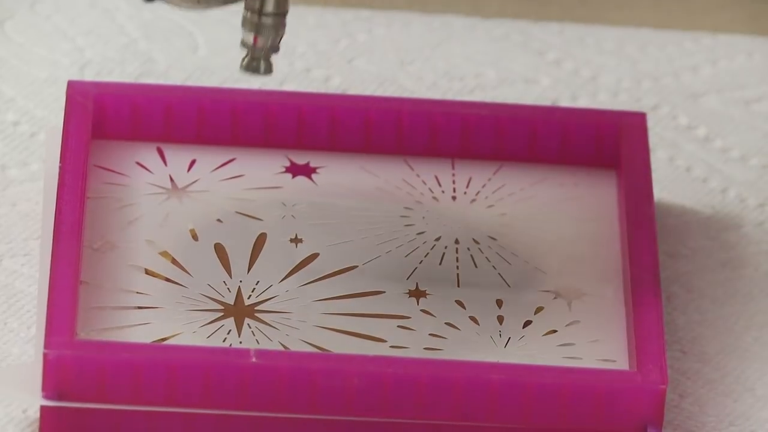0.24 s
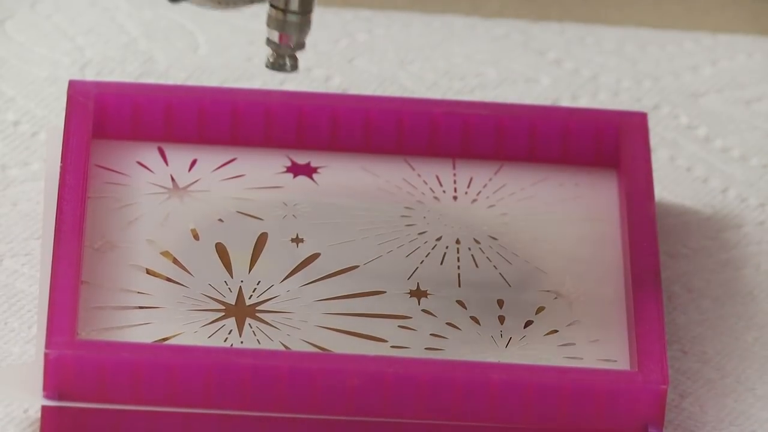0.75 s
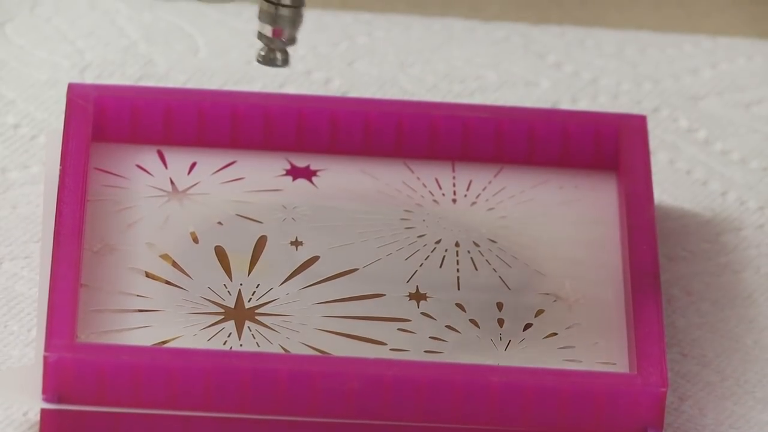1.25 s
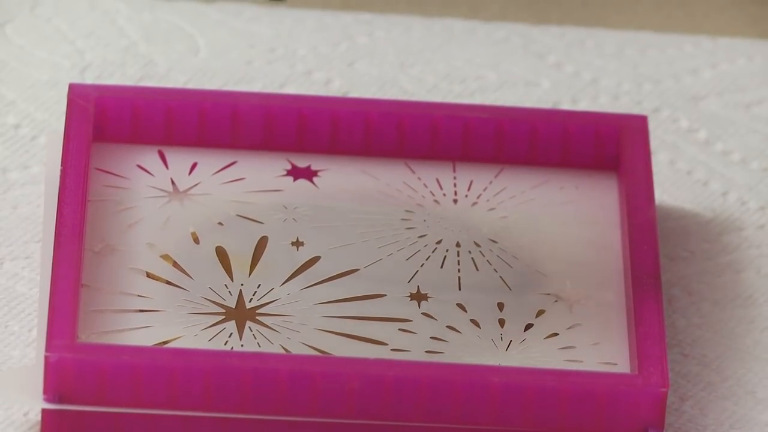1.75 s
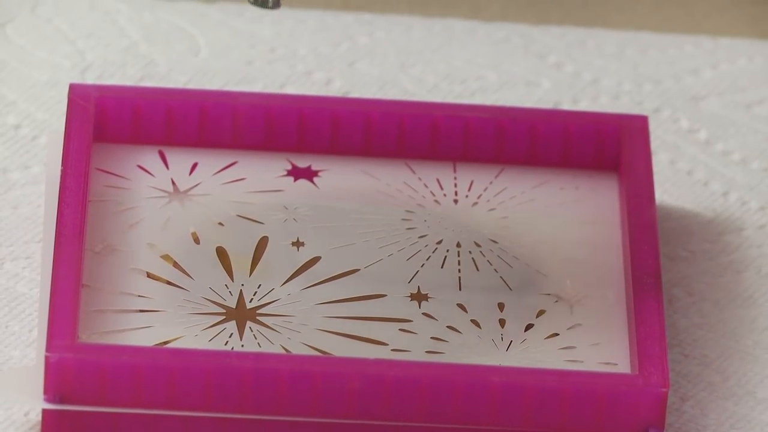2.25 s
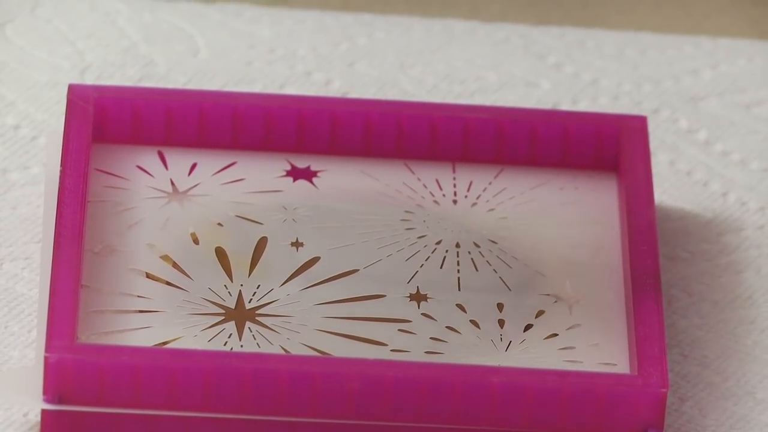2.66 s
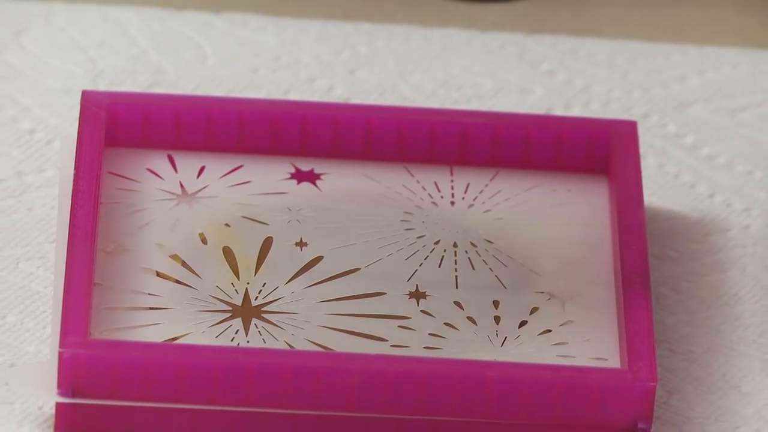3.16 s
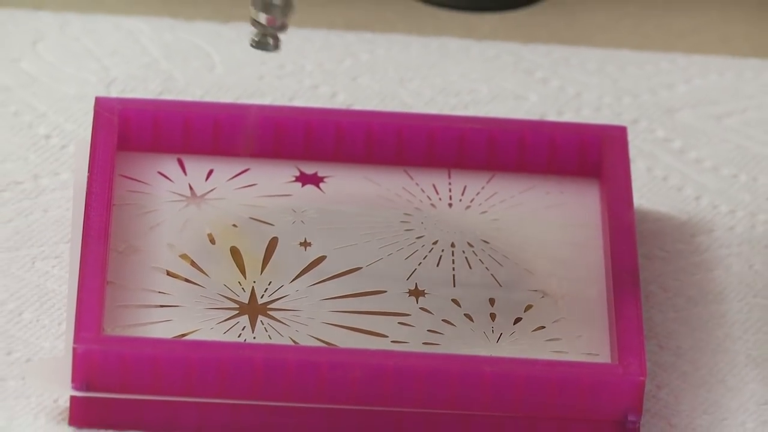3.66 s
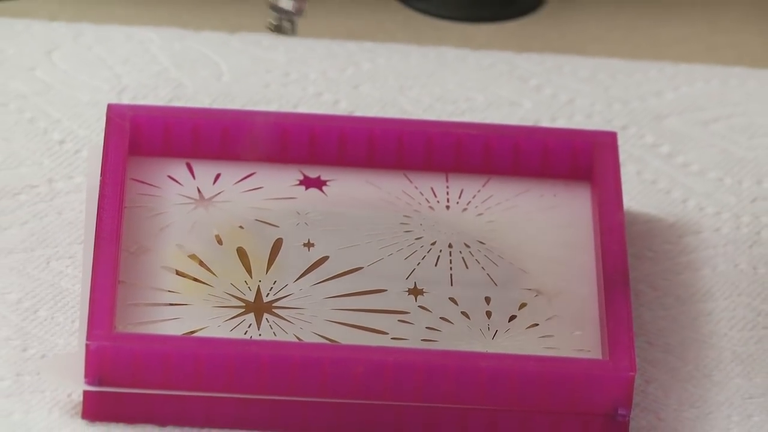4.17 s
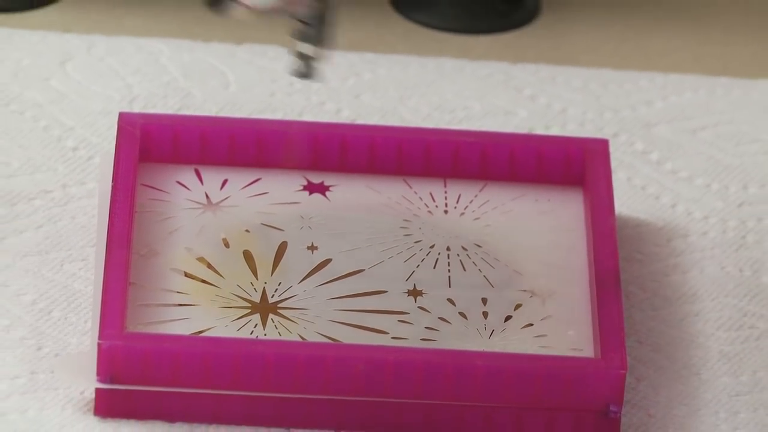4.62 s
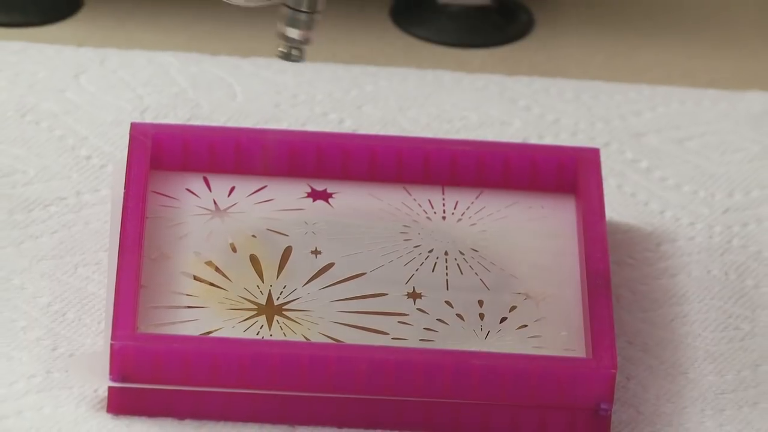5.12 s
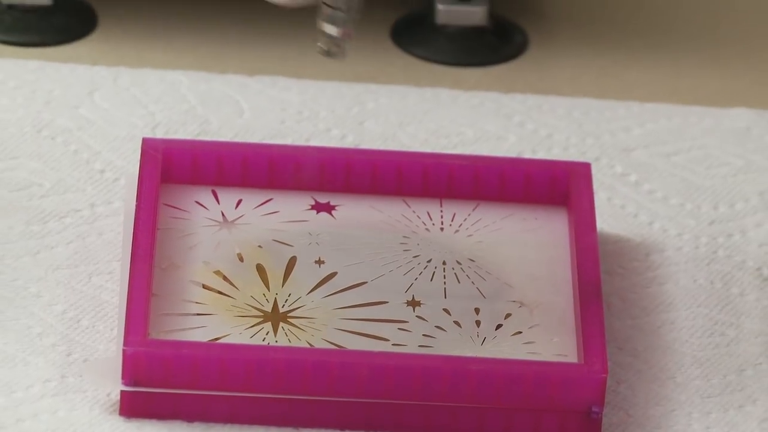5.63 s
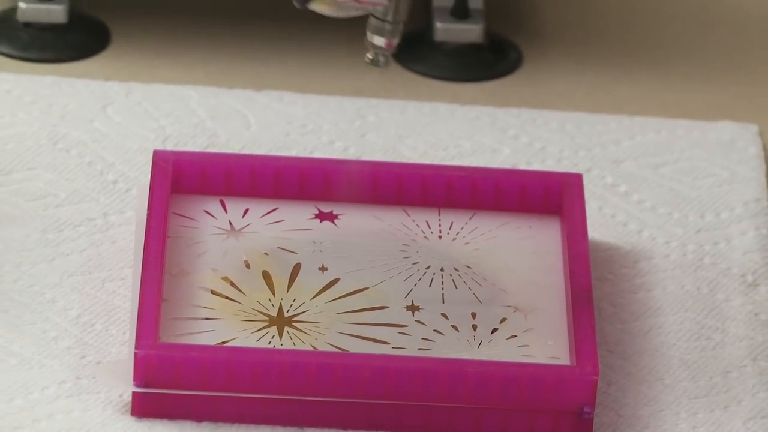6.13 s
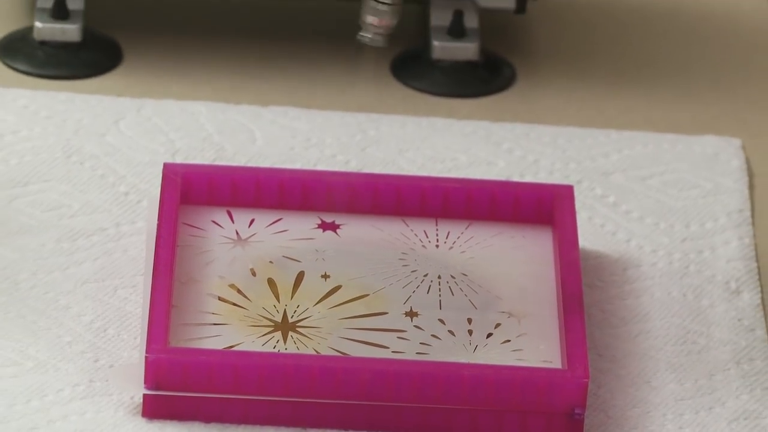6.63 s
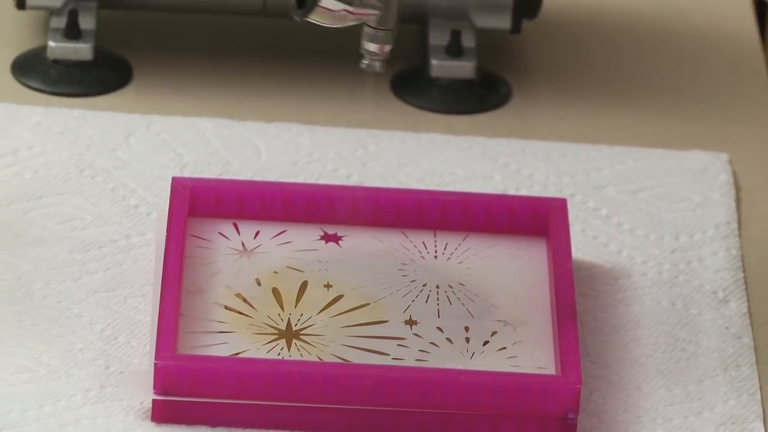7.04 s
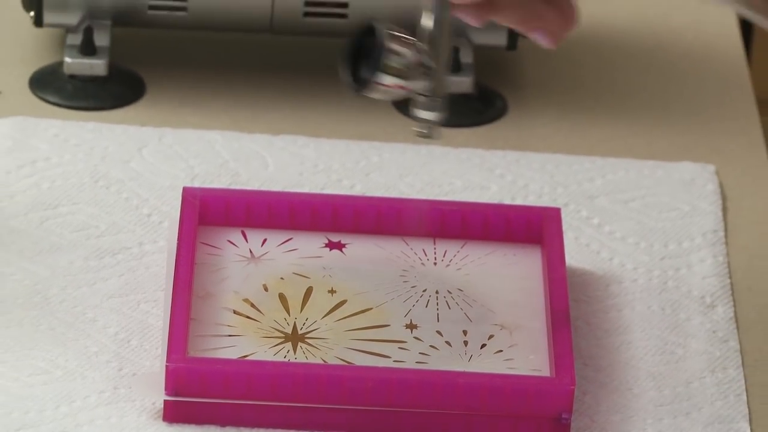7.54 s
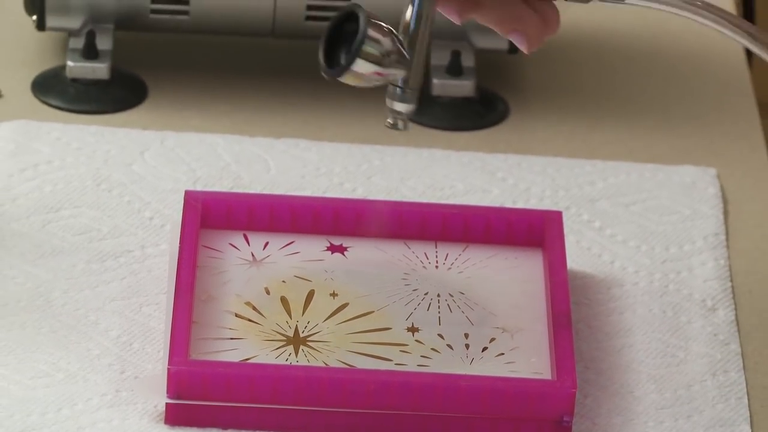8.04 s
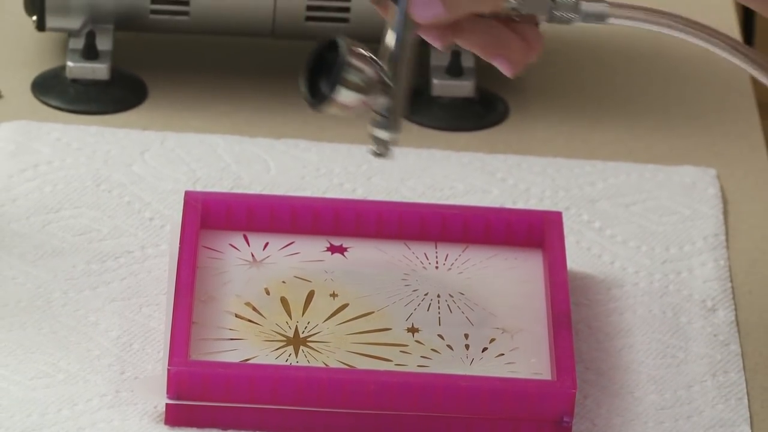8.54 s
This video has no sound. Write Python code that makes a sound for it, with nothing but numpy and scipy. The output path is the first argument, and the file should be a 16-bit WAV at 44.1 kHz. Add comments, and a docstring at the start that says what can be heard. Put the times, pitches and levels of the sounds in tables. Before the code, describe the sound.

An airbrush spits and settles into a high, airy hiss, swishing unevenly across a stencil in a plastic tray. It stops for a moment early on, resumes with a low puff and more strong sweeps, then continues with lighter passes. Underneath, a small piston compressor thrums and ticks quickly without a break. Both are heard from nearby in a quiet kitchen with a short, faint echo.

```python
"""Airbrush and small compressor

A piston compressor runs on a kitchen counter while an airbrush sprays a stencil in a plastic tray.
Each turn of the shaft pops two valves and rings the pump head near 1 kHz, and the motor's hum beats
against the strokes. The air hisses, swells where it hits the stencil, and stops once, briefly,
when the trigger is let go."""
import sys
import numpy as np
from scipy import signal
from scipy.fft import rfft, irfft, next_fast_len
from scipy.io import wavfile
from scipy.ndimage import uniform_filter1d, map_coordinates

SR = 44100
rng = np.random.default_rng(int(sys.argv[2]) if len(sys.argv) > 2 else 0)


def master(y):
    """Save y as 16-bit WAV."""
    cut = np.clip(np.atleast_2d(y).T, -1, 1)
    pcm = np.round(cut * 32767)  # scale
    wavfile.write(sys.argv[1], SR, pcm.astype(np.int16))


N = 387638

SHAFT_HZ, MOTOR_HUM_HZ = 28.24, 120.06
# The pause in the spraying: let_go_s, pressed_again_s
TRIGGER_PAUSE = (1.886, 2.131)
# Two bands of hiss sink as the nozzle crosses the tray: time_s, lower_hz, upper_hz
HISS_PITCHES = [(0, 7900, 10500), (2.4, 7900, 11000), (3.4, 7600, 11100), (4.0, 7700, 10700),
                (4.8, 7400, 10500), (5.6, 6700, 10000), (6.2, 6500, 10000), (6.6, 6400, 9550),
                (8.3, 6500, 9550), (8.79, 7200, 10200)]


def amp(db):
    """Turns decibels into a number to multiply by."""
    return 10 ** (np.asarray(db) / 20)


def unit(x):
    """Scales a signal to an average strength (rms) of 1."""
    return x / np.sqrt(np.mean(x ** 2) + 1e-20)


def clock():
    """The time of every sample, in seconds."""
    return np.arange(N) / SR


def along(points, hz):
    """Reads between (pitch_hz, value) points on a log pitch scale."""
    pitches, values = np.transpose(points)
    return np.interp(np.log(hz + 1), np.log(pitches + 1), values)


def curves(rows):
    """Joins rows of (time_s, values...) into one curve per value column."""
    times, *columns = np.transpose(rows)
    return [np.interp(clock(), times, column) for column in columns]


def wobble(rate):
    """A smooth curve through `rate` random points a second."""
    return map_coordinates(rng.standard_normal(int(N * rate / SR) + 4), [clock() * rate])


def filtered(x, response):
    """Multiplies each frequency in x by response(hz)."""
    size = next_fast_len(N + SR // 2)
    return irfft(rfft(x, size) * response(np.fft.rfftfreq(size, 1 / SR)), size)[:N]


def noise(colour):
    """Noise shaped by (pitch_hz, gain_db) points."""
    return unit(filtered(rng.standard_normal(N), lambda hz: amp(along(colour, hz))))


def band(centre_hz, width_hz):
    """Noise around one pitch, which may move."""
    phase = 2 * np.pi * np.cumsum(centre_hz * np.ones(N)) / SR
    slow = lambda: filtered(rng.standard_normal(N), lambda hz: 1 / (1 + (hz / width_hz) ** 2) ** 2)
    return unit(slow() * np.cos(phase) + slow() * np.sin(phase))


def swell(peak_s, spread_s):
    """One bell-shaped rise and fall."""
    return np.exp(-.5 * ((clock() - peak_s) / spread_s) ** 2)


def stroke(turn, place, sharpness):
    """A smooth bump once a turn, at `place` (0 to 1) within the turn."""
    return np.exp(sharpness * (np.cos(2 * np.pi * (turn - place)) - 1))


def room_tone():
    """The faint, steady rumble of the room."""
    # Its tone colour: pitch_hz, gain_db
    colour = [(10, -13), (25, 0.5), (50, -6.5), (100, -13), (200, -17.5), (450, -19), (1750, -15.5),
              (2100, -29.5), (3000, -34.5), (11000, -35.5), (16000, -37)]
    return amp(-52.5) * noise(colour)


def kitchen_echo(x):
    """The kitchen adds a short echo whose treble dies first."""
    # How long the echo takes to fall by 60 dB: pitch_hz, fade_s
    fade_times = [(200, 0.59), (3000, 0.27), (14000, 0.21)]
    hz, t, spectrum = signal.stft(rng.standard_normal(SR // 2), SR, nperseg=256)
    fade = amp(-60 * t / along(fade_times, hz)[:, None])
    tail = signal.istft(spectrum * fade, SR, nperseg=256)[1]
    late_tail = np.pad(tail, (200, 0)) / np.linalg.norm(tail)
    return signal.fftconvolve(x, late_tail)[:N]


def puffs():
    """The sudden stop and restart of the air each give a soft, low thump."""
    # The puffs of air: peak_s, level_db, spread_s, pitch_hz
    thumps = [(1.895, -55, 0.011, 69.6), (2.146, -34.5, 0.012, 36)]
    return sum(amp(db) * swell(s, spread) * np.sin(2 * np.pi * hz * (s - clock()))
               for s, db, spread, hz in thumps)


def back_pressure(lag_s):
    """Trapped air, about 0 to 1: high at the start and after the trigger is let go, then leaking away."""
    build_s, linger_s, leak_s = .11, 0.36, 0.73
    let_go_s, pressed_s = TRIGGER_PAUSE
    t = clock() - lag_s
    build = np.clip((t - let_go_s) / build_s, 0, 1)
    leak = np.exp(-np.maximum(t - pressed_s - linger_s, 0) / leak_s)
    at_start = 0.87 * np.exp(-clock() / leak_s)
    return at_start + build * leak


def thrum(turn, slip):
    """Intake and exhaust pop in opposite directions, half a turn apart, over a low hum."""
    # The pump's overtones: times_shaft_speed, gain_db
    overtones = [(1, -34), (2, -9), (3, -6), (4, -9.5), (5, 1), (6, -11.5), (7, -2.5), (8, -31), (9, -6),
                 (10, -43), (11, -7), (12, -17.5), (13, -4), (14, -17.5), (15, -11.5), (16, -47), (17, -7),
                 (18, -16), (19, -9.5), (20, -11.5), (21, -10), (22, -23), (23, -7), (24, -14), (25, -1.5),
                 (26, -18), (27, -24), (28, -10.5), (29, -13.5), (30, -7.5), (31, -6), (32, -9.5), (33, -6)]
    intake, exhaust = .186, .688  # places within a turn
    cycle = np.linspace(0, 1, num=2048)
    wave = np.zeros(len(cycle))
    for order, db in overtones:
        pops = np.exp(-2j * np.pi * order * intake) - .5 * np.exp(-2j * np.pi * order * exhaust)
        smear = 0.92 * min(order / 20, 1) * rng.standard_normal()  # the housing blurs high overtones
        wave += amp(db) * np.cos(2 * np.pi * order * cycle + np.angle(pops) + smear)
    popping = np.interp(turn % 1, cycle, wave)
    hum = np.cos(2 * np.pi * (5 * (turn - intake) + slip))  # motor hum plus shaft speed: 148 Hz
    return amp(-49) * unit(popping) + amp(-57) * unit(hum)


def head_ring(turn, slip, unrest):
    """The pump head rings twice a turn, hard then soft; the motor's beat makes it limp."""
    # The ring while air flows freely: time_s, level_db
    free_levels = [(0, -41), (1.5, -41.5), (4.6, -41.5), (6.55, -40), (7.5, -42), (8.79, -41.5)]
    free_db, = curves(free_levels)
    choke_db = -4 * back_pressure(lag_s=0.3) * back_pressure(0)  # pressure damps the ring a bit later
    limp = 1 + .21 * np.cos(2 * np.pi * slip) - .07 * np.cos(4 * np.pi * slip)
    pitch_sway = 0.064 * np.sin(2 * np.pi * (turn + slip))
    phase = 2 * np.pi * 36 * turn + pitch_sway + 1.1 * unrest * wobble(50)
    hard = limp * stroke(turn, place=.505, sharpness=1.52) * np.sin(phase)
    soft = 0.61 * stroke(turn, place=.02, sharpness=1.52) * np.sin(phase - 2.41)
    roughness = 1 + 0.059 * wobble(40)
    return amp(free_db + choke_db) * unit((hard + soft) * roughness)


def groan(turn, unrest):
    """The pump strains against trapped air with a nasal tone once a turn."""
    tone = stroke(turn, place=.8, sharpness=1.6) * np.sin(2 * np.pi * 21 * turn)
    return amp(-57.5) * unrest * unit(tone)


def valve_ticks(turn, slip, unrest):
    """The valve flaps slap shut and ring the casing, louder under pressure."""
    # The notes of the pump casing: pitch_hz, width_hz, gain_db
    casing_notes = [(1350, 58, -4), (1484, 58, -5), (1557, 64, -4), (1629, 87, 5.5), (1718, 23, 11.5),
                    (2115, 130, 4.5)]
    # What the casing walls let out: pitch_hz, gain_db
    walls = [(1000, -38), (1270, 3.5), (1760, 1), (1840, -21), (2200, -7.5), (2800, -14)]
    slaps = np.zeros(N)
    for place, db in [(.335, -1.5), (.69, -6), (0.0997, -15.5)]:
        at = np.flatnonzero(np.diff(np.floor(turn - place)) > 0)
        throb = 1 + 0.024 * np.cos(2 * np.pi * slip[at])
        slaps[at] += amp(db + 0.7 * rng.standard_normal(len(at))) * throb
    casing = lambda hz: sum(amp(db) * 1j * hz * width / (pitch ** 2 - hz ** 2 + 1j * hz * width)
                            for pitch, width, db in casing_notes)
    ringing = filtered(slaps, lambda hz: casing(hz) * amp(along(walls, hz)))
    return amp(-55.5 + 3.8 * unrest) * unit(ringing)


def intake_chuffs(turn):
    """Air snaps through the intake in two faint, bright spurts a turn."""
    spurts = stroke(turn, place=0.23, sharpness=24) + 0.7 * stroke(turn, place=0.44, sharpness=11)
    hiss = band(10800, width_hz=3600) + 0.49 * band(4500, width_hz=1100)
    return amp(-64) * unit(spurts * hiss)


def compressor():
    """The motor lags a little behind the mains power, so its pull beats against the piston."""
    turn = SHAFT_HZ * clock() + .0008 * wobble(4.5)  # shaft turns so far
    slip = (MOTOR_HUM_HZ - 4 * SHAFT_HZ) * clock() + .18  # beats so far, about 7 a second
    unrest = 0.14 + .8 * back_pressure(0)  # trapped air unsettles the valves
    return (thrum(turn, slip) + head_ring(turn, slip, unrest) + groan(turn, unrest)
            + valve_ticks(turn, slip, unrest) + intake_chuffs(turn))


def drifting(x, depth_db):
    """Reflections around the moving nozzle lift and lower narrow parts of the hiss."""
    spectrum = signal.stft(x, nperseg=512)[2]
    ripples = rng.standard_normal(spectrum.shape)
    for _ in range(2):
        ripples = uniform_filter1d(ripples, size=7, axis=0)  # smooth over pitch
        ripples = uniform_filter1d(ripples, size=26, axis=1)  # smooth over time
    return unit(signal.istft(spectrum * amp(depth_db * unit(ripples)), nperseg=512)[1][:N])


def hiss_bursts():
    """Short bursts of hiss: spits and a whistle at the start, later puffs of air on the stencil."""
    # The bursts: peak_s, level_db, spread_s, pitch_hz, width_hz
    bursts = [(0.058, -42, 0.0073, 5940, 5000), (0.084, -43, 0.041, 1305, 915),
              (.119, -34, 0.019, 7820, 1800), (0.154, -41, 0.053, 8800, 3500),
              (.24, -45.5, 0.047, 3290, 250), (0.268, -45, 0.055, 10500, 1200),
              (0.313, -49.5, 0.082, 2094, 700), (5.446, -48.5, 0.017, 4900, 2500),
              (5.685, -51.5, .018, 4410, 2400), (6.814, -52, 0.033, 4210, 2600),
              (8.44, -49, .04, 7000, 2000)]
    hiss = sum(amp(db) * swell(s, spread) * band(hz, width) for s, db, spread, hz, width in bursts)
    return hiss * amp(2.3 * wobble(510))


def flutter():
    """A spell of quick, small hand strokes makes a very high hiss flutter."""
    peak_s, strokes_per_s = 4.6, 5.04
    strokes = stroke(strokes_per_s * (clock() - peak_s), place=0, sharpness=1.1)
    return amp(-42.5) * swell(peak_s, spread_s=0.48) * strokes * band(12600, width_hz=1400)


def hand_passes():
    """A loudness curve that swells each time the hand sweeps the jet over the stencil."""
    # The sweeps: peak_s, level_db, spread_s
    sweeps = [(0.128, -38, 0.03), (0.292, -38, 0.08), (0.622, -38, 0.054), (0.963, -41, 0.053),
              (1.254, -38, 0.031), (1.562, -39.5, 0.057), (1.856, -40.5, 0.056), (2.22, -35.5, 0.098),
              (2.408, -38.5, 0.051), (2.746, -41.5, 0.052), (2.87, -40, 0.034), (3.202, -41, 0.045),
              (3.395, -39.5, 0.061), (3.646, -35.5, 0.052), (3.89, -36.5, 0.062), (4.07, -44, 0.047),
              (4.34, -46, 0.03), (4.755, -52, 0.037), (4.924, -50, 0.03), (5.194, -49.5, 0.025),
              (5.46, -50, 0.028), (5.688, -52, .03), (6.536, -52, 0.038), (6.81, -47.5, 0.043),
              (7.03, -47, 0.033), (7.243, -54, .035), (8.234, -47, 0.049), (8.44, -46.5, 0.051),
              (8.74, -46, 0.062)]
    return np.sqrt(sum(amp(db) ** 2 * swell(s, spread) for s, db, spread in sweeps))  # powers add


def edge_hiss(passes):
    """Air grazes the stencil's cut edges in two bands of hiss; each pass lifts the upper one."""
    # Base levels of the two bands: time_s, lower_db, upper_db
    edge_levels = [(0, -53, -62), (3.0, -53, -64), (3.9, -52, -47), (5.1, -53, -60), (6.4, -58, -50.5),
                   (7.8, -56.5, -58), (8.79, -54, -58)]
    lower_db, upper_db = curves(edge_levels)
    lower_hz, upper_hz = curves(HISS_PITCHES)
    lower_gain = amp(lower_db + 1.5 + 0.5 * wobble(12))
    lower = drifting(band(lower_hz, width_hz=1540), depth_db=2.5)
    upper_gain = np.hypot(amp(upper_db + 2.1 * wobble(12)), amp(-14) * passes)
    upper = drifting(band(upper_hz, width_hz=1100), depth_db=2.1)
    return lower_gain * lower + upper_gain * upper


def stencil_and_tray(passes):
    """The jet rushes on the stencil, and the tray roars lower down, rising and falling with it."""
    # The rush between passes, weaker as the nozzle draws back: time_s, level_db
    rush_levels = [(0, -51.5), (2.6, -48.5), (4.55, -50.5), (5.95, -58.5), (6.5, -56), (8.0, -54),
                   (8.79, -66)]
    # Tone colour of air hitting the stencil: pitch_hz, gain_db
    stencil_colour = [(1120, -30), (1900, -13.5), (2170, -10.5), (2450, -13.5), (3040, -2), (3790, -5),
                      (4080, -9), (4460, 0.5), (5380, 0.5), (6350, -2.5), (6970, -11), (8000, -12),
                      (10400, -25), (17600, -120)]
    # Tone colour of the plastic tray: pitch_hz, gain_db
    tray_colour = [(150, -20), (450, -3.5), (650, 0), (1000, 4.5), (1300, -1), (1650, 4.5), (2200, 0.5),
                   (2550, -29), (3200, -13), (4000, -10)]
    rush_db, = curves(rush_levels)
    stencil_db = 20 * np.log10(np.hypot(amp(rush_db), passes))
    stencil = amp(stencil_db + 0.96 * wobble(35)) * drifting(noise(stencil_colour), depth_db=0.85)
    hard_hit_db = -37.5
    tray = amp(-46.5 + 0.9 * (stencil_db - hard_hit_db)) * noise(tray_colour)
    return stencil + tray


def nozzle_hiss():
    """The jet hisses at the nozzle; its echo off the counter shifts with the hand, so it swishes."""
    # Loudness at the nozzle: time_s, level_db
    jet_levels = [(0, -42.5), (.25, -39.5), (.42, -42), (1.8, -42.5), (2.2, -39.5), (2.68, -42.5),
                  (2.89, -39), (3.05, -40.5), (3.62, -43), (4.5, -38), (5.97, -42), (6.07, -39.5),
                  (6.7, -39), (7.45, -39.5), (8.3, -40), (8.72, -42)]
    # Tone colour of the jet: pitch_hz, gain_db
    jet_colour = [(3000, -21.5), (6000, -13), (9500, -9), (11300, -2.5), (12300, 2.5), (13200, -1),
                  (14200, 0), (15700, -3.5)]
    jet_db, = curves(jet_levels)
    _, upper_hz = curves(HISS_PITCHES)
    gain = amp(jet_db + 0.91 * wobble(25) + .5 * wobble(10))
    hiss = drifting(noise(jet_colour), depth_db=1.4)
    sinking = upper_hz / upper_hz[0]  # the echo comes later as the upper band sinks
    delay_s = .00085 / sinking * (1 + .025 * wobble(2.5))
    echo = map_coordinates(hiss, [(clock() - delay_s) * SR], order=3)
    return gain * unit(hiss + .2 * echo)


def air_flow():
    """The air, 0 to 1: it rises at the start and shuts off while the trigger is let go."""
    let_go_s, pressed_s = TRIGGER_PAUSE
    valve_open = (clock() < let_go_s) | (clock() > pressed_s)
    rise = np.clip(0.61 + (clock() - 0.013) / 0.089, 0, 1)
    return rise * uniform_filter1d(valve_open.astype(float), size=180)


def airbrush():
    """All the sounds of the spray, switched together by the trigger."""
    passes = hand_passes()
    spray = stencil_and_tray(passes) + nozzle_hiss() + edge_hiss(passes) + hiss_bursts() + flutter()
    return air_flow() * spray


def scene():
    """The spray and its echo over the compressor and the room, the same in both ears."""
    air = airbrush()
    mono = air + amp(-15.5) * kitchen_echo(air) + compressor() + puffs() + room_tone()
    return np.array([mono, mono])


def record(dry):
    """Cuts off the very highest treble."""
    top_hz = 15750
    return np.array([filtered(channel, lambda hz: hz < top_hz) for channel in dry])


dry = scene()
out = record(dry)
master(out)
```